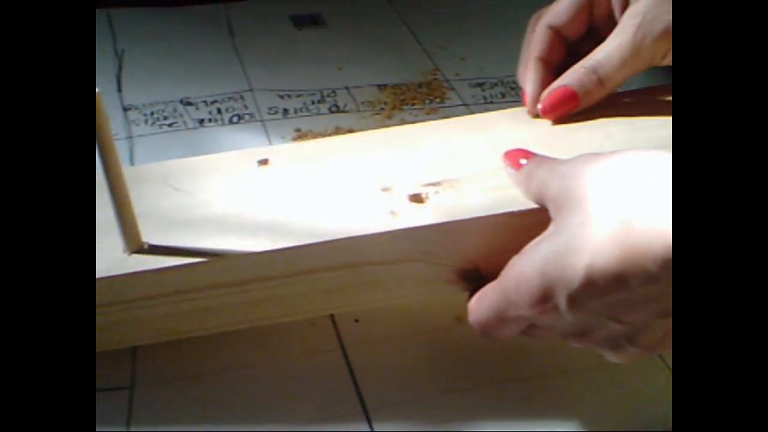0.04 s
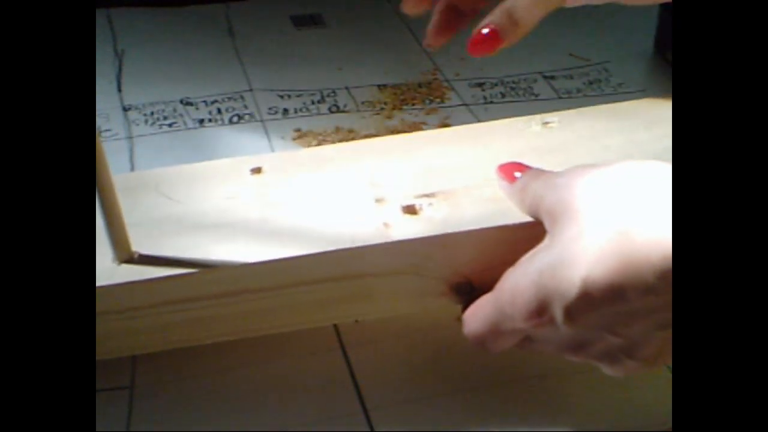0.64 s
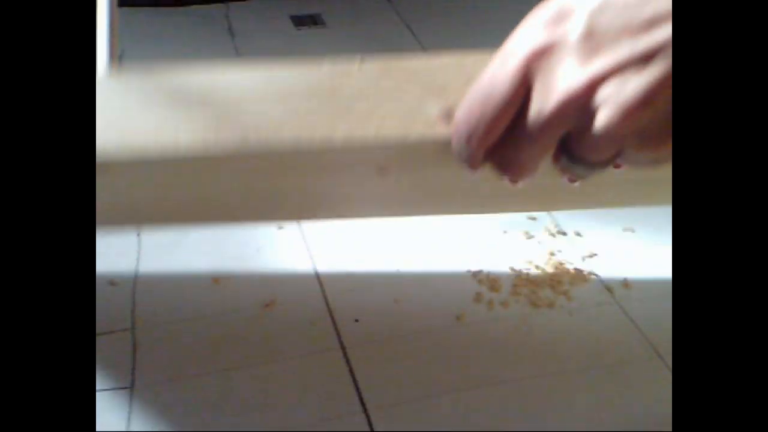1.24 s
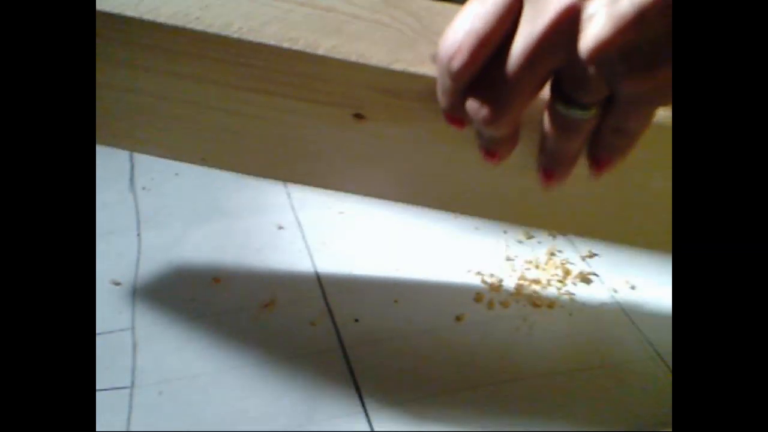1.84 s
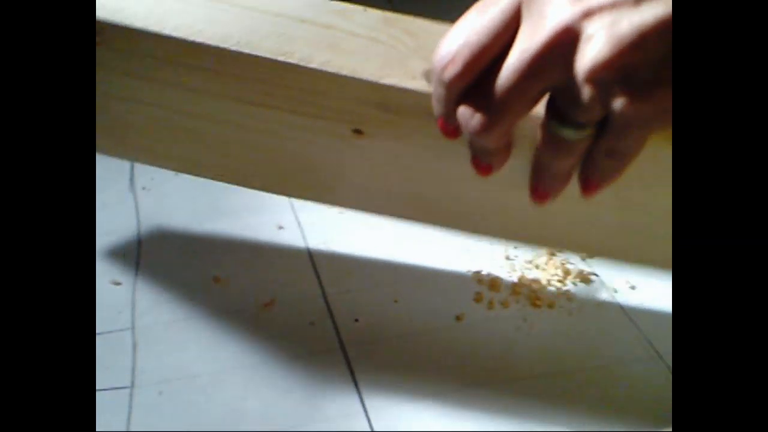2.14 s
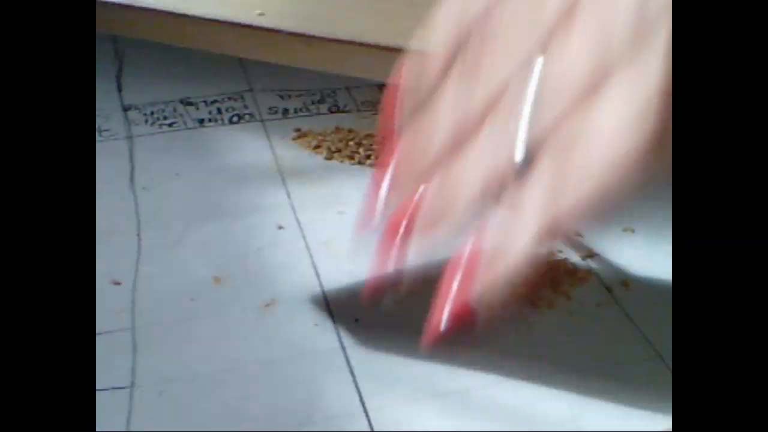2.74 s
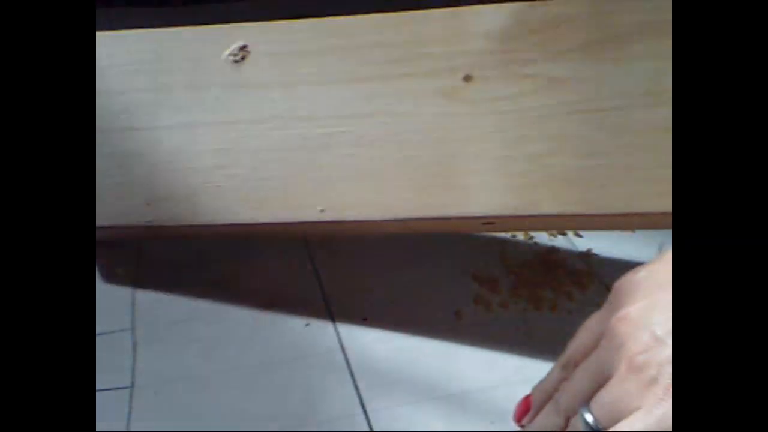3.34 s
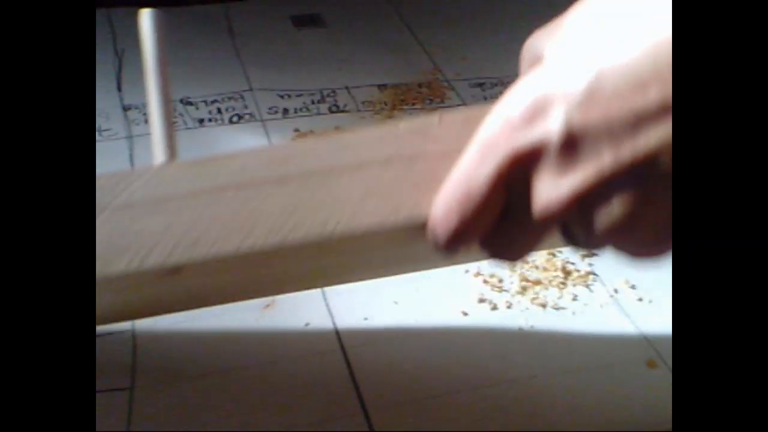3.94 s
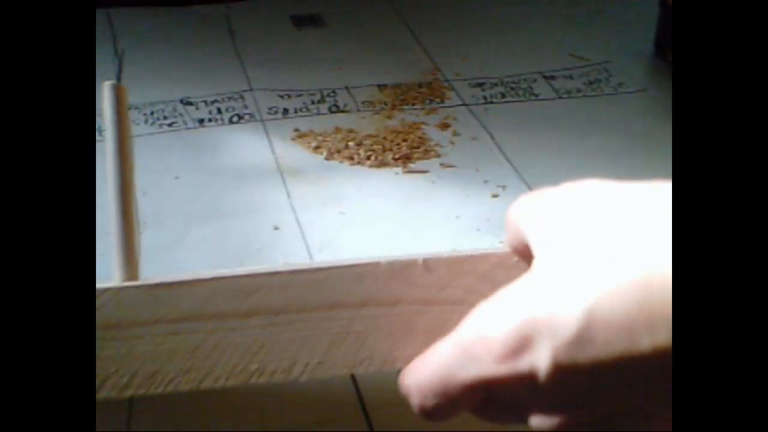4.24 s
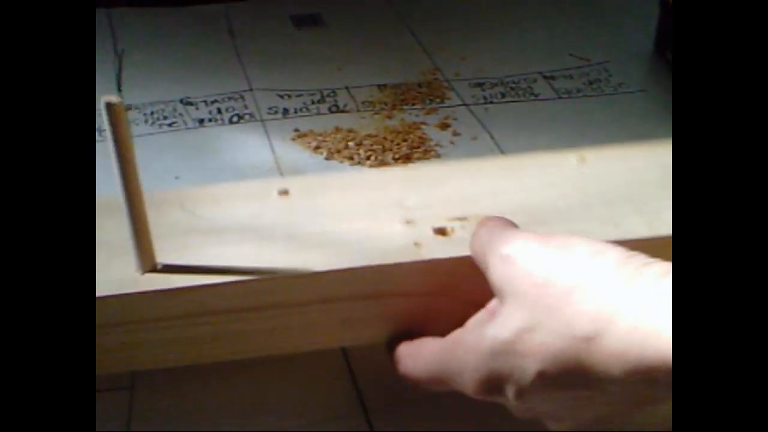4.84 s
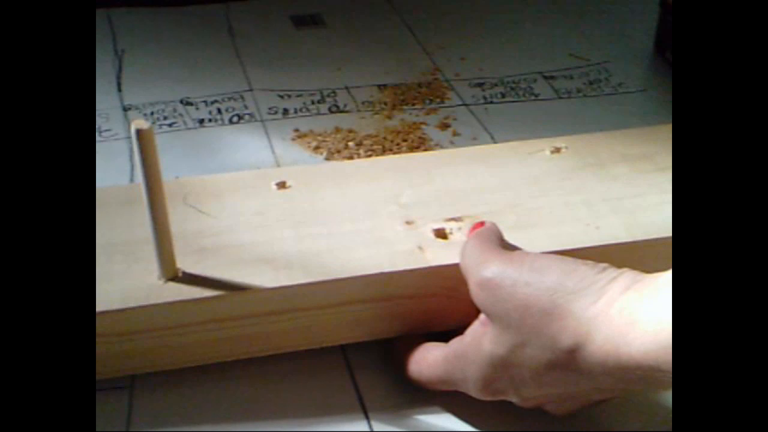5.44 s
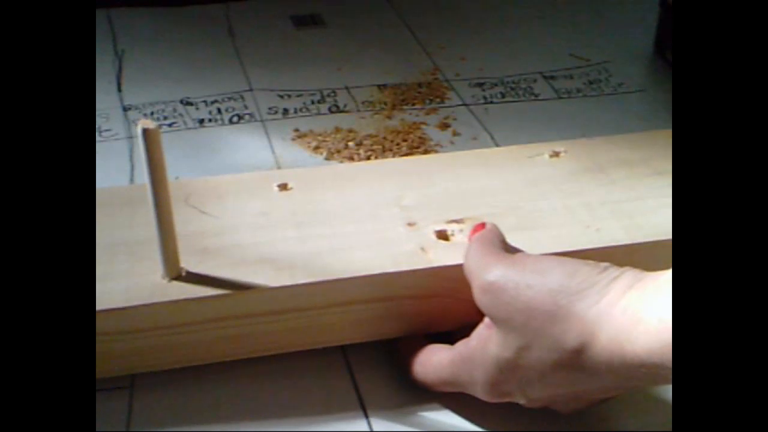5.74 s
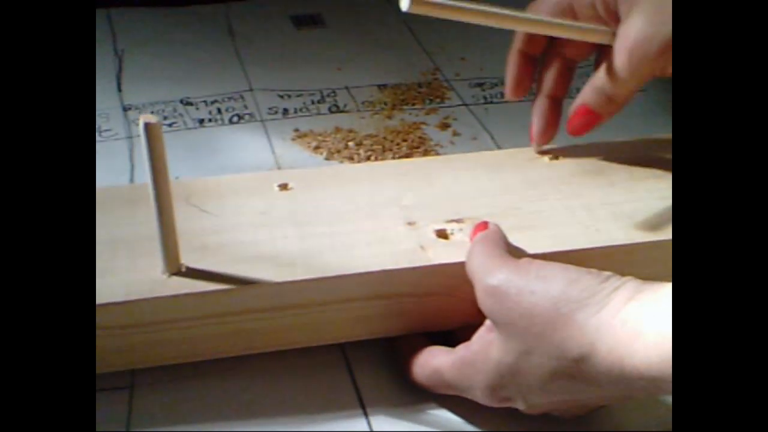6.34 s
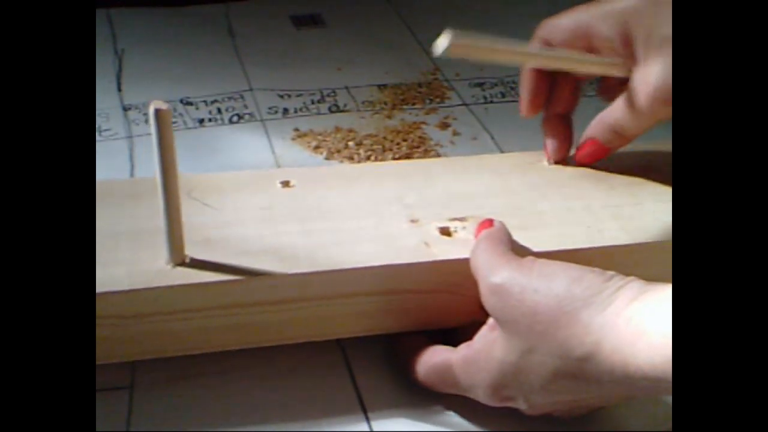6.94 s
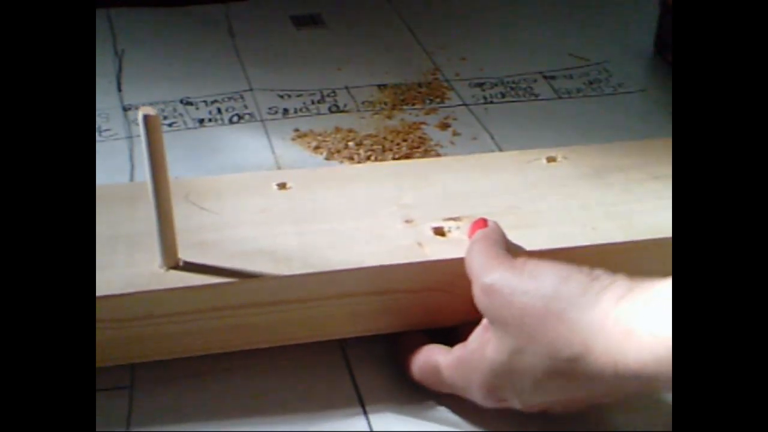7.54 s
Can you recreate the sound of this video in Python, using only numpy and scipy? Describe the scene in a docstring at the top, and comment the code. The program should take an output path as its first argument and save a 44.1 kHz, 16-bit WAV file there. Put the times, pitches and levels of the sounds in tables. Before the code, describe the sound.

In a small room with hard walls, an appliance hums quietly over rumble and hiss. Fingers tick against a wooden board, then four quick, hollow knocks shake it and rattle a peg. The board bumps down onto tile and lands with a deep thud. Fingers brush sawdust across the wood between light taps, and a dowel clicks sharply once. The microphone is close and slightly muffled.

```python
"""A wooden board rings in its bending modes, handled on a tile floor in a small hard room.
Held up, it is knocked four times to shed sawdust, its peg rattling, then laid down in two blows
and a boom. Light bumps and taps follow, one of them sharp, with a ringing dowel.
Fingers tick and brush over the wood; an appliance hums over rumble and hiss.
A cheap, close microphone dulls the blows."""
import sys
import numpy as np
from scipy import signal
from scipy.fft import rfft, irfft, next_fast_len
from scipy.io import wavfile
from scipy.ndimage import map_coordinates

SR = 44100
rng = np.random.default_rng(int(sys.argv[2]) if len(sys.argv) > 2 else 0)


def log_audio(samples):
    """Write samples as a 16-bit WAV file to the path given in sys.argv[1]."""
    # one column per channel
    frames = np.atleast_2d(samples).T
    # limit to full scale, then quantise
    limited = np.clip(frames, -1, 1)
    pcm = np.round(limited * 32767).astype(np.int16)
    wavfile.write(sys.argv[1], SR, pcm)


N = 339898


def amp(db):
    """Decibels to gain."""
    return 10 ** (np.asarray(db) / 20)


def unit(x):
    """x at rms 1."""
    return x / np.sqrt(np.mean(x ** 2) + 1e-20)


def along(points, hz):
    """(frequency, value) points interpolated on a log axis."""
    point_hz, values = np.transpose(points)
    return np.interp(np.log(hz + 1), np.log(point_hz + 1), values)


def wobble(rate_hz):
    """Smooth random curve, rate_hz knots a second."""
    knots = rng.standard_normal(int(N * rate_hz / SR) + 4)
    return map_coordinates(knots, [np.arange(N) * rate_hz / SR])


def filtered(x, response):
    """x through a frequency response."""
    n = x.shape[-1]
    size = next_fast_len(n + SR // 4)
    return irfft(rfft(x, size) * response(np.fft.rfftfreq(size, 1 / SR)), size)[..., :n]


def coloured(x, spectrum):
    """x shaped by a spectrum, at rms 1."""
    return unit(filtered(x, lambda hz: amp(along(spectrum, hz))))


def dying(t, t60_s):
    """Decay of 60 dB in t60_s."""
    return np.exp(-np.log(1000) * t / t60_s)


def add(track, start_s, sound):
    """Mix sound into track from start_s."""
    part = track[round(start_s * SR):][:len(sound)]
    part += sound[:len(part)]


# Hum tones (frequency [Hz], rms level [dB])
HUM_TONES = [(157.2, -58), (52.8, -60.5)]
# Hiss spectrum (frequency [Hz], relative density [dB])
HISS_SPECTRUM = [(100, -22), (250, 2.5), (500, -1), (1000, -5), (2000, -6), (4500, -7.5), (6300, -10.5),
                 (9700, -17), (10800, -45.5), (12500, -85)]
# Rumble spectrum (frequency [Hz], relative density [dB])
RUMBLE_SPECTRUM = [(3, 0), (10, -2.5), (18, -7.5), (35, -11.5), (70, -21), (130, -23), (220, -26),
                   (400, -46.5), (900, -86)]
def background(hiss_db=-59.5, rumble_db=-48, waver_db=1.4, drift_rad=0.086):
    """An appliance hums, wavering slightly, over low rumble and steady hiss."""
    hum, t = np.zeros(N), np.arange(N) / SR
    for hz, db in HUM_TONES:
        gain = amp(db + waver_db * wobble(4.1))
        hum += gain * unit(np.sin(2 * np.pi * hz * t + drift_rad * wobble(2.6)))
    hiss = amp(hiss_db) * coloured(rng.standard_normal(N), HISS_SPECTRUM)
    rumble = amp(rumble_db) * coloured(rng.standard_normal(N), RUMBLE_SPECTRUM)
    return hum + hiss + rumble


# Reverb decay (frequency [Hz], t60 [s])
ROOM_DECAY = [(100, 0.77), (300, 0.66), (800, 0.64), (2000, 0.7), (4000, 0.6), (9000, 0.4)]
# Reverb colour (frequency [Hz], gain [dB])
ROOM_SPECTRUM = [(50, -17), (160, -3.5), (300, -3.5), (800, 0), (1500, -2.5), (3300, -4.5), (5000, -3.5),
                 (6500, 3.5)]
def in_room(x, room_db, build_up_s=0.002):
    """x plus diffuse reflections off hard walls, drawn anew for each source position."""
    hz, frame_s, noise = signal.stft(rng.standard_normal(SR), SR, nperseg=256)
    decay = dying(frame_s, along(ROOM_DECAY, hz)[:, None])
    _, tail = signal.istft(noise * decay, SR, nperseg=256)
    t = np.arange(len(tail)) / SR
    tail = filtered(tail, lambda f: amp(along(ROOM_SPECTRUM, f))) / np.linalg.norm(dying(t, 0.38))
    response = amp(room_db) * tail * (1 - np.exp(-t / build_up_s))
    response[0] += 1  # direct sound
    return signal.fftconvolve(x, response)


CRACK_LAG_S = 0.0007  # blow onset to crack
# Nail and edge clicks (time [s], level [dB], centre [Hz])
NAIL_CLICKS = [(.498, -32.5, 4500), (.6648, -38, 3350), (.697, -40, 4460), (.743, -45, 4370),
               (1.348, -44.5, 3840), (1.3955, -44.5, 4000), (1.6436, -34.5, 3760), (1.8182, -27.5, 4040),
               (1.8667, -18.5, 3340), (2.598, -41, 3440), (3.0243, -22.5, 3940), (3.0383, -37, 3900),
               (3.0773, -37, 4140), (3.1005, -40, 4400), (3.3434, -16.5, 4760), (3.727, -28.5, 3560),
               (3.742, -33.5, 4350), (3.871, -41, 4200), (5.2205, -39.5, 3700), (7.666, -41, 4400)]
# Contact crackle spectrum (frequency [Hz], relative level [dB])
CRACK_SPECTRUM = [(100, -25), (700, -9), (1600, -7), (2400, -2), (3200, .5), (3800, -1), (4450, 0),
                  (5300, -9), (6300, -11), (7500, -19), (12000, -26)]
def clicks(q=4.0, t60_s=0.008, room_db=-1):
    """Each hard contact (nail, edge, blow, tap) is a brief crackle in one broad resonance."""
    out, t = np.zeros(N), np.arange(SR // 10) / SR
    fade = dying(t, t60_s)
    cracks = [(s + CRACK_LAG_S, db, hz) for s, *_, db, hz in [*BOARD_BLOWS, *FACE_TAPS]]
    for start_s, db, centre_hz in [*cracks, *NAIL_CLICKS]:
        resonance = lambda f: 1j * f * centre_hz / (q * (centre_hz ** 2 - f ** 2) + 1j * f * centre_hz)
        noise = fade * rng.standard_normal(len(t))
        burst = filtered(noise, lambda f: resonance(f) * amp(along(CRACK_SPECTRUM, f)))
        burst *= np.linalg.norm(fade) / np.linalg.norm(burst)
        add(out, start_s, in_room(amp(db) * burst, room_db))
    return out


# Finger strokes (peak time [s], half width [s], level [dB])
FINGER_STROKES = [(0.688, 0.03, -54), (1.24, 0.017, -64), (3.851, 0.022, -50), (4.242, 0.014, -54),
                  (4.598, 0.045, -60), (5.041, 0.066, -59.5), (5.225, 0.014, -53), (6.382, 0.019, -61),
                  (6.974, 0.046, -59.5), (7.67, 0.044, -52.5)]
# Friction spectrum (frequency [Hz], relative level [dB])
RUB_SPECTRUM = [(500, -11.5), (1800, -13), (3200, 0.5), (4600, -2.5), (6500, -16), (10000, -37)]
def brushing(grip_db=-66, grain_db=5, room_db=-3):
    """Sawdust rolls under the fingers in tiny uneven grains."""
    t = np.arange(N) / SR
    swell = lambda peak_s, half_s: np.exp(-((t - peak_s) / half_s) ** 2)
    grip = amp(grip_db) * swell(peak_s=1, half_s=0.27)  # the hand slides to its hold
    strokes = sum(amp(db) * swell(peak_s, half_s) for peak_s, half_s, db in FINGER_STROKES)
    grains = coloured(rng.standard_normal(N) * amp(grain_db * wobble(400)), RUB_SPECTRUM)
    return in_room((grip + strokes) * grains, room_db)[:N]


# Board modes; the very short one near 500 Hz is the slap
# (frequency [Hz], held level [dB], lying level [dB], face-tapped level [dB], t60 [s])
BOARD_MODES = [(259.6, -52, -7, -29, 0.17), (506, -16, 26.5, -30, 0.015), (105, -14, -13, -24, .1),
               (185, -20, -6, -24, .08), (292, -24, 2.5, -22, .2), (413, -22, 1, -26, .1),
               (512, -18, 0.5, -26, .09), (588, -6, 6, -24, .09), (638, -2, 8, -22, .12),
               (705, -4, 10, -10, .06), (760, -7, 10, -8, .06), (818, -7, 9, -1.5, .13),
               (895, -9, -16, -20, .04), (1060, -16, 9, -12, .04), (1145, -14, 8.5, -8, .045),
               (1232, -12, 8.5, -1, .04), (1380, 3, 1, 7, .025), (1650, 5, -30, -20, .012),
               (1740, -12, 8, -20, .1), (1850, -2, 5, -24, .035), (1950, -2, 3, -24, .03),
               (2057, -8, -2, -8, .22), (2200, -3, -20, -16, .02), (2292, 10, -10, 5, 0.011),
               (2860, -10, -2, -20, 0.057), (3200, -13, 4, -10, 0.06), (3630, -5, -14, -20, 0.011),
               (3920, -5, -5, -19, 0.016), (4490, -20, 2, -27, .018), (4670, -22, -7, -23, 0.022)]
def board_ring(mode_db, tilt_db_per_oct, grip=0, grip_t60_s=0.13, scatter_db=1, attack_s=0.0011):
    """One blow starts all modes in phase; a gripping hand adds damping."""
    t = np.arange(SR // 2) / SR
    hz, *_, t60_s = np.transpose(BOARD_MODES)
    modes = np.sin(2 * np.pi * hz[:, None] * t) * dying(t, t60_s[:, None]) * (1 - np.exp(-t / attack_s))
    octaves = np.maximum(np.log2(hz / 820), 0)  # a soft contact misses the upper modes
    gains = amp(mode_db + tilt_db_per_oct * octaves + scatter_db * rng.standard_normal(len(hz)))
    return gains @ modes * dying(grip * t, grip_t60_s)


# Blows on the board (time [s], air push [dB], contact [s], ring [dB], tilt [dB/oct],
# main mode boost [dB], lying flat [0-1], crack [dB], crack centre [Hz])
BOARD_BLOWS = [(1.519, -22, .0042, -46, 5, -6, 0.1, -25, 4070),
               (1.5203, -16.5, 0.00097, -23.5, -0.5, -0.5, 0.01, -19, 4060),
               (1.6897, -14.5, 0.00187, -37.5, 5.5, 10, 0, -21, 3120),
               (1.8645, -20, 0.0046, -32.5, 6.5, 14.5, 0, -29, 3400),
               (1.8708, -25.5, 0.00087, -57, 7, 2, 0.02, -14.5, 3220),
               (2.0558, -12.5, 0.0017, -34, 7, 7.5, 0.12, -18.5, 4260),
               (3.0275, -34, 0.002, -36.5, -7, -2.5, 0.9, -32.5, 3350),
               (3.0857, -19.5, 0.0021, -45.5, -27, 0, 1, -56, 4050),
               (3.3445, -19, 0.0015, -24.5, -2, -8.5, 0.9, -23, 3680),
               (3.758, -20, 0.0039, -42, -24, -4.5, 0.35, -41.5, 3570),
               (4.493, -34, 0.0046, -65, -13, -13, 0.92, -52, 3600)]
def knocks(push_highpass_hz=28, main_hz=782, main_width_oct=0.13, room_db=-5, floor_boost_db=2):
    """Each blow shoves the air and rings the board: damped in the hand, deeper and longer on the floor."""
    out, t = np.zeros(N), np.arange(SR // 2) / SR
    hz, held_db, lying_db, *_ = np.transpose(BOARD_MODES)
    # the strike point sets how strongly the main bending modes ring
    main_weight = np.exp(-(np.log2(hz / main_hz) / main_width_oct) ** 2)
    for start_s, push_db, contact_s, ring_db, tilt_db_per_oct, main_db, flat, *_ in BOARD_BLOWS:
        push = amp(push_db) * np.sin(np.pi * np.minimum(t / contact_s, 1)) ** 2
        # slow air slips round the board
        push = filtered(push, lambda f: 1j * f / (push_highpass_hz + 1j * f))
        mode_db = ring_db + held_db + flat * (lying_db - held_db) + main_db * main_weight
        ring = board_ring(mode_db, tilt_db_per_oct, grip=1 - flat)
        add(out, start_s, in_room(push + ring, room_db + floor_boost_db * flat))
    return out


def snaps(re_push_db=-28, t60_s=0.019, highpass_hz=8500):
    """A knock on the raised board has a faint, dry snap in the top treble."""
    out, t = np.zeros(N), np.arange(SR // 20) / SR
    for start_s, push_db, *_, flat, _, _ in BOARD_BLOWS:
        noise = dying(t, t60_s) * rng.standard_normal(len(t))
        burst = filtered(noise, lambda f: 1 - 1 / (1 + (f / highpass_hz) ** 20))
        add(out, start_s + CRACK_LAG_S, amp(push_db + re_push_db) * (1 - flat) * burst)
    return out


def struck(modes, hits, attack_s, room_db):
    """An object rings in the same modes at every hit, with new random phases."""
    out, t = np.zeros(N), np.arange(SR // 2) / SR
    onset = 1 - np.exp(-t / attack_s)
    for start_s, hit_db in hits:
        ring = sum(amp(db) * np.sin(2 * np.pi * (hz * t + rng.random())) * dying(t, t60_s)
                   for hz, db, t60_s in modes)
        add(out, start_s, in_room(amp(hit_db) * ring * onset, room_db))
    return out


# Peg modes (frequency [Hz], relative level [dB], t60 [s])
PEG_MODES = [(2180, -6, .03), (2400, -6, .03), (2930, 0, .035), (3290, -2, .04), (3450, 0, .055),
             (3700, -10, .03), (3930, -5, .035)]
# Peg impacts (time [s], level [dB])
PEG_IMPACTS = [(1.6908, -32.5), (1.8641, -32), (1.8662, -28), (1.8722, -33.5)]
def peg():
    """The peg rattles in its hole as the board is knocked."""
    return struck(PEG_MODES, PEG_IMPACTS, attack_s=0.00055, room_db=2)


# Board-on-floor modes (frequency [Hz], relative level [dB], t60 [s])
THUD_MODES = [(62, -7, .16), (104, -8, .36), (127, -9, .36), (168, -5, .2), (210, 0, .18), (238, -5, .2),
              (330, -3, .2)]
def thud(start_s=3.3445, level_db=-28.5):
    """The board's full weight lands; board and floor boom together."""
    return struck(THUD_MODES, [(start_s, level_db)], attack_s=0.0012, room_db=-3)


# Taps on the board's face (time [s], ring [dB], tilt [dB/oct], crack [dB], crack centre [Hz])
FACE_TAPS = [(4.8635, -43, -11, -40.5, 3540), (5.3575, -41, 8.5, -22, 3600), (5.569, -55, 2, -44.5, 4200),
             (7.1465, -42.5, -11, -52, 3600)]
def taps(room_db=-10):
    """A light tap on the resting board excites mainly a few modes: a short, clear tok."""
    out = np.zeros(N)
    *_, tapped_db, _ = np.transpose(BOARD_MODES)
    for start_s, ring_db, tilt_db_per_oct, *_ in FACE_TAPS:
        add(out, start_s, in_room(board_ring(ring_db + tapped_db, tilt_db_per_oct), room_db))
    return out


# Dowel modes (frequency [Hz], relative level [dB], t60 [s])
DOWEL_MODES = [(2430, -15, .03), (2680, -11, .02), (2880, 0, .018), (3220, -2, .018), (3565, 0, .022),
               (4240, -7, .018), (4700, 1.5, .015), (5110, -10, .02), (5600, -19, .015), (6150, -16, .015)]
# Dowel strike and bounce (time [s], level [dB])
DOWEL_IMPACTS = [(5.3578, -22), (5.3597, -25.5)]
def dowel():
    """A loose dowel hits the board, bounces at once and rings short and high."""
    return struck(DOWEL_MODES, DOWEL_IMPACTS, attack_s=0.00059, room_db=-2.5)


def scene(pan_right_db=0.12, mic_lowpass_hz=6200):
    """Near-mono mix, blows slightly right; the dull microphone loses most of their top treble."""
    blows = knocks() + thud() + taps() + clicks() + peg() + dowel()
    blows = filtered(blows, lambda hz: 1 / np.sqrt(1 + (hz / mic_lowpass_hz) ** 20)) + snaps()
    return blows * amp([[-pan_right_db], [pan_right_db]]) + brushing() + background()


def record(dry, lowpass_hz=12600, dc_offset=-0.0217):
    """The recorder cuts the top treble and rests slightly off zero."""
    return filtered(dry, lambda hz: 1 / (1 + (hz / lowpass_hz) ** 100)) + dc_offset


dry = scene()
out = record(dry)
log_audio(out)
```